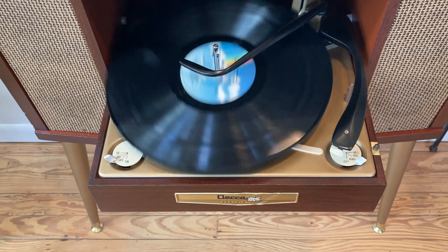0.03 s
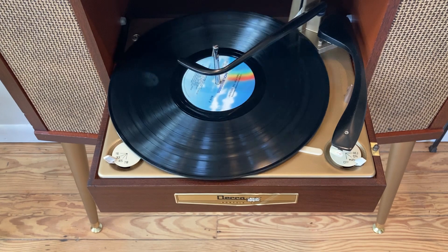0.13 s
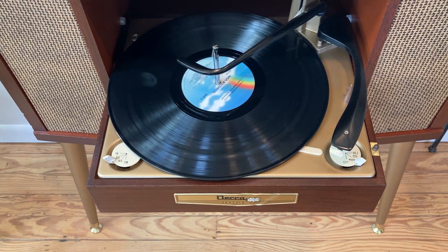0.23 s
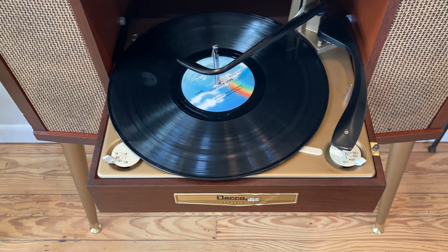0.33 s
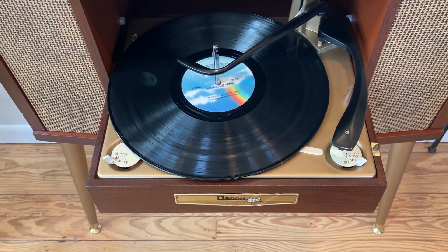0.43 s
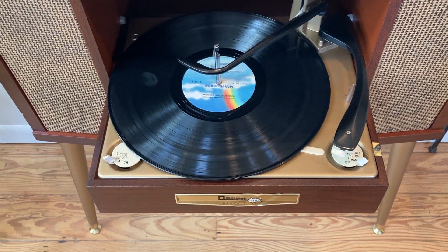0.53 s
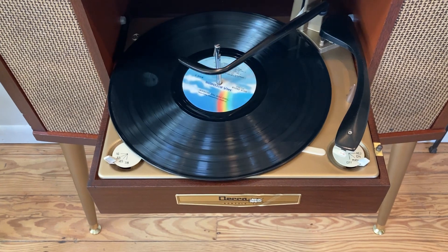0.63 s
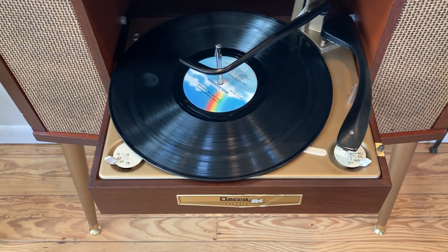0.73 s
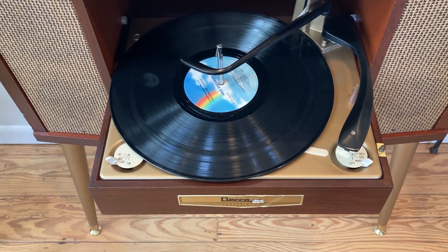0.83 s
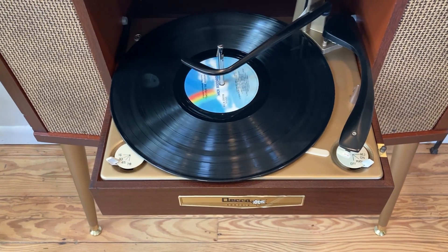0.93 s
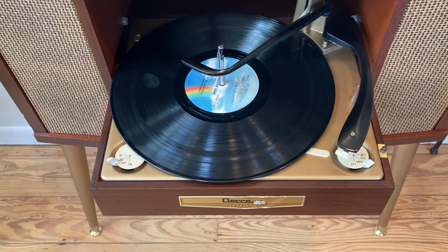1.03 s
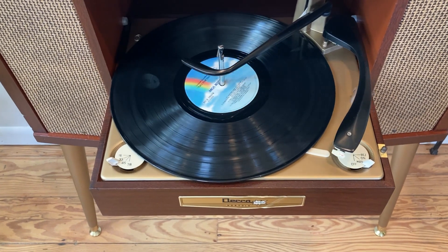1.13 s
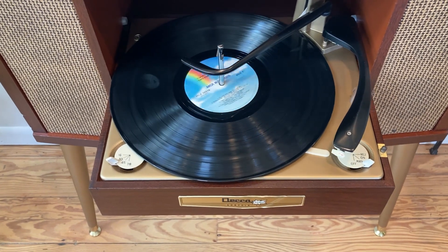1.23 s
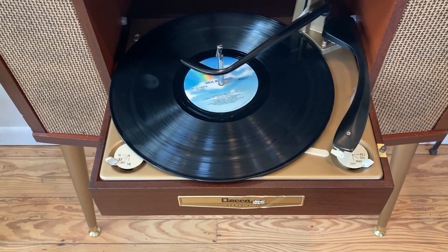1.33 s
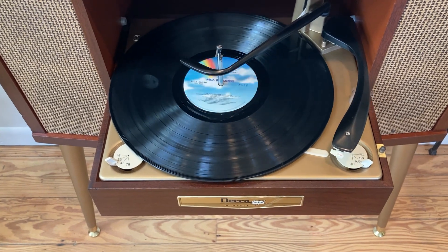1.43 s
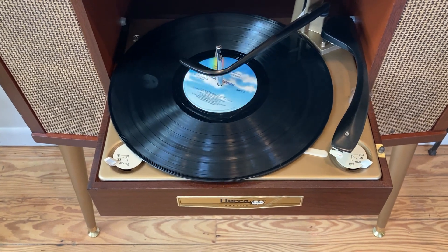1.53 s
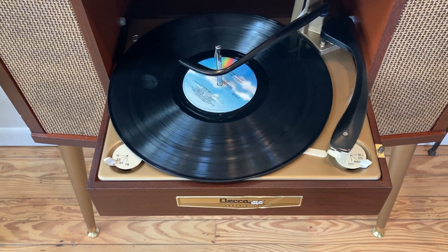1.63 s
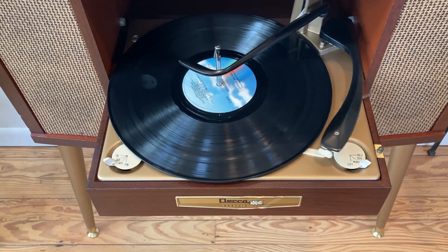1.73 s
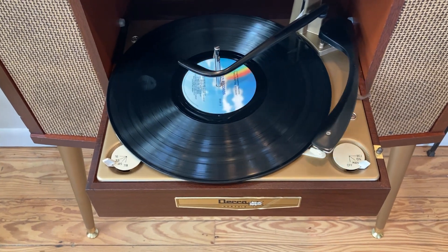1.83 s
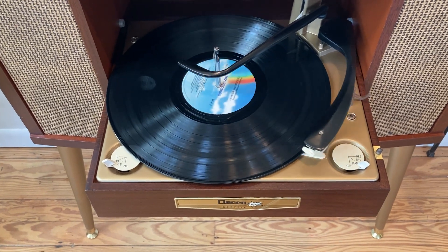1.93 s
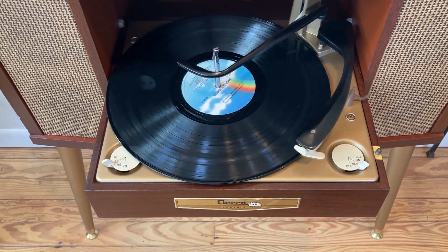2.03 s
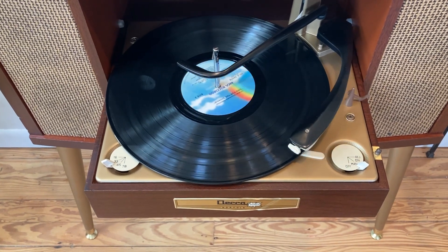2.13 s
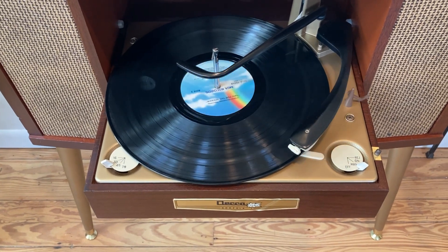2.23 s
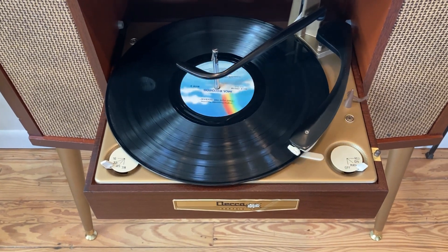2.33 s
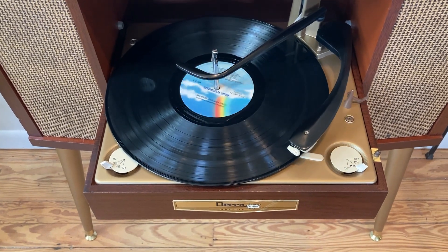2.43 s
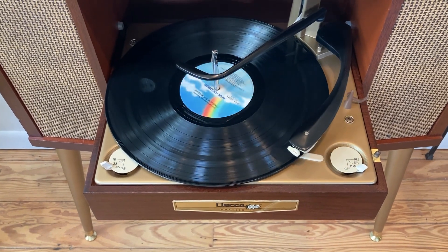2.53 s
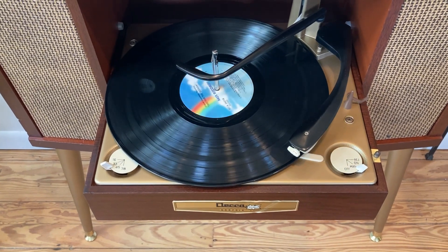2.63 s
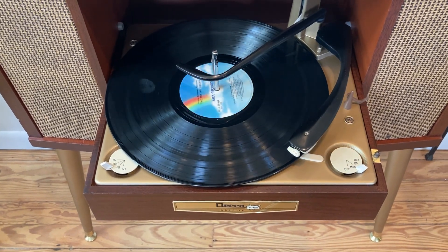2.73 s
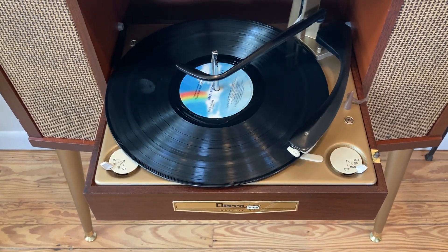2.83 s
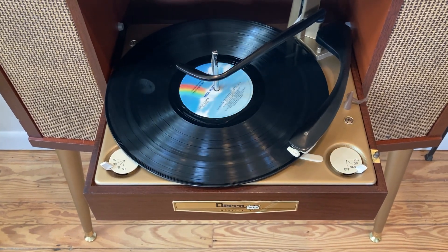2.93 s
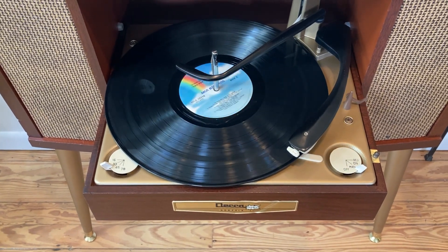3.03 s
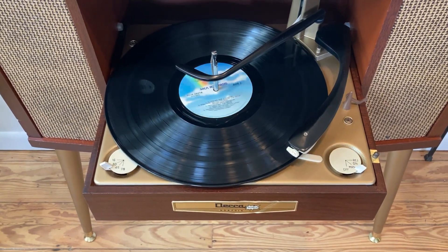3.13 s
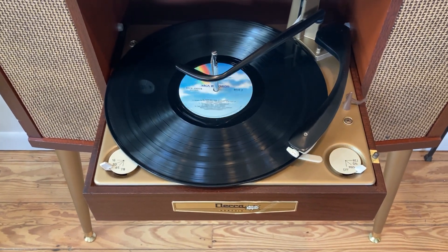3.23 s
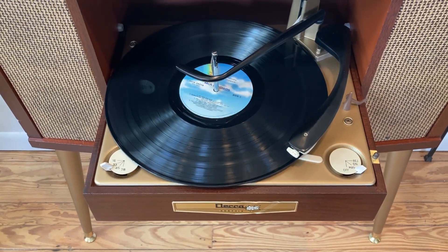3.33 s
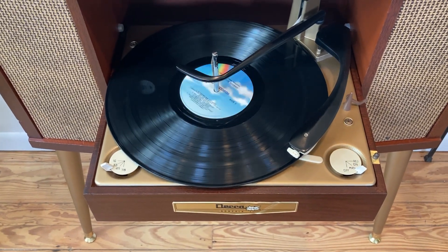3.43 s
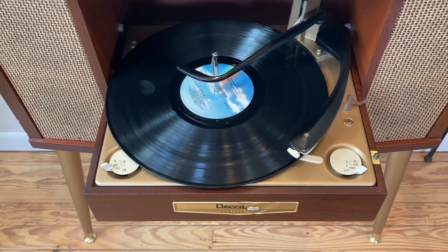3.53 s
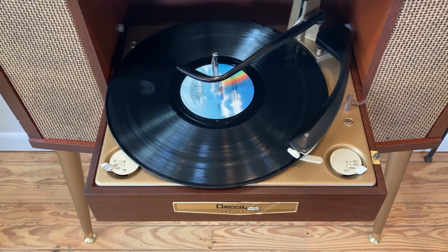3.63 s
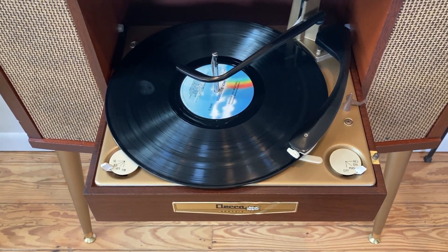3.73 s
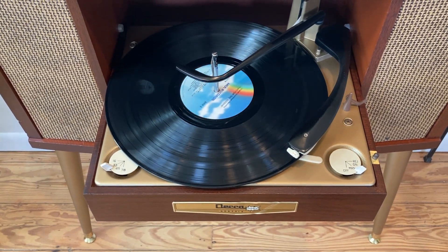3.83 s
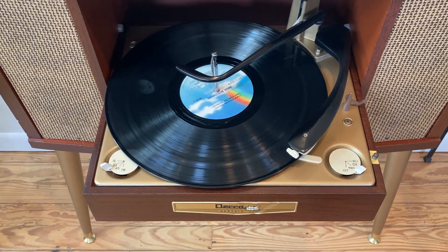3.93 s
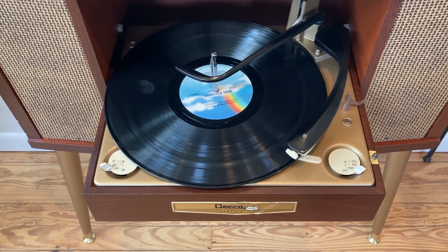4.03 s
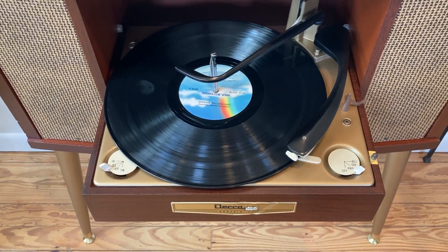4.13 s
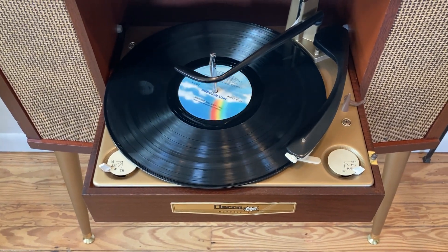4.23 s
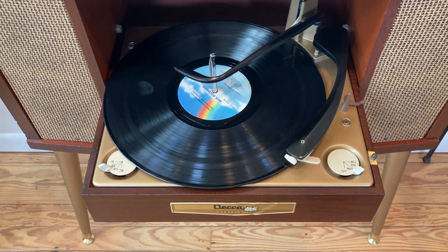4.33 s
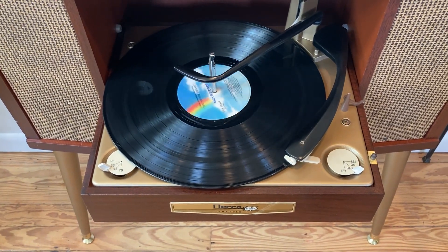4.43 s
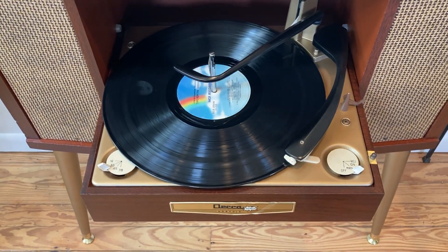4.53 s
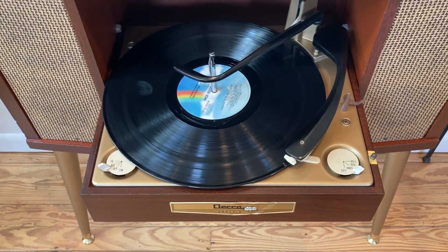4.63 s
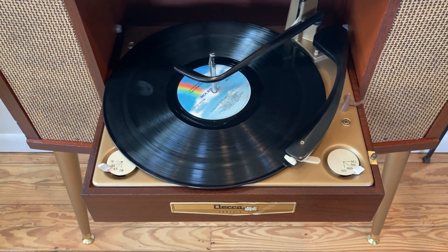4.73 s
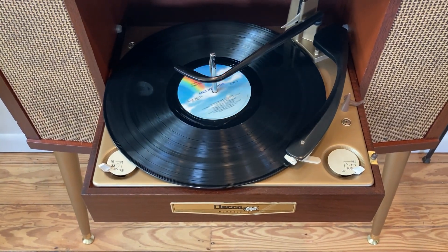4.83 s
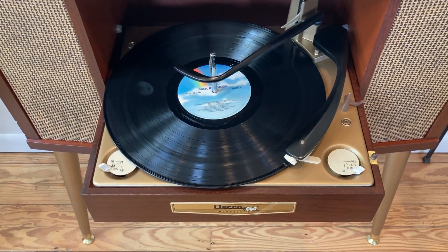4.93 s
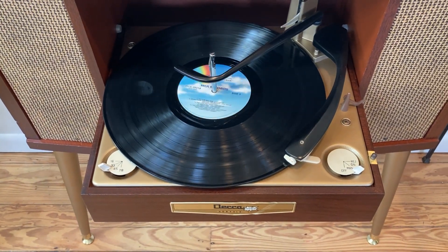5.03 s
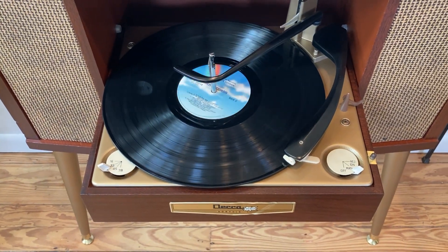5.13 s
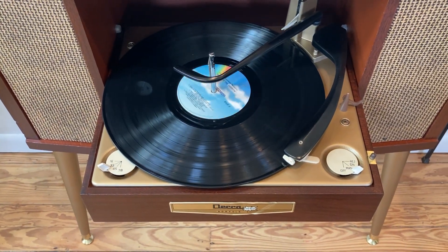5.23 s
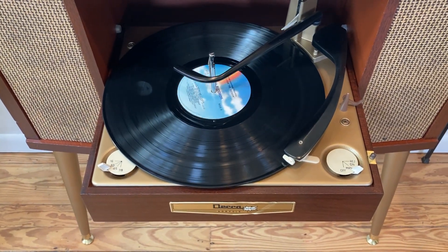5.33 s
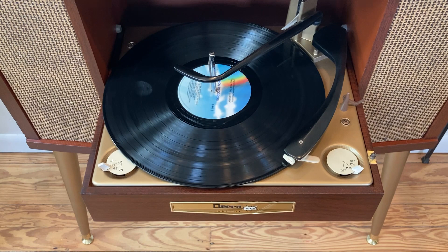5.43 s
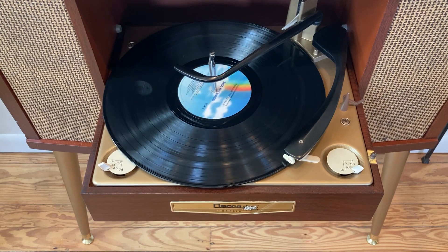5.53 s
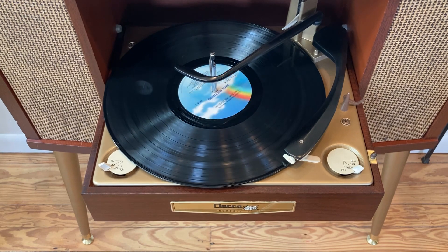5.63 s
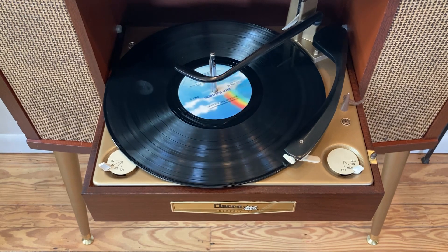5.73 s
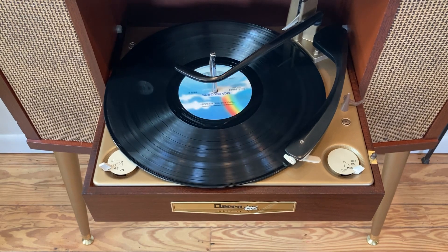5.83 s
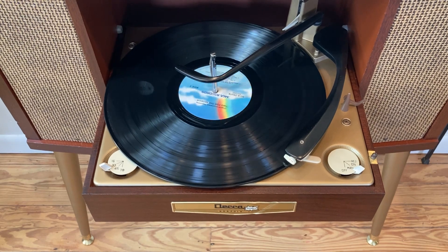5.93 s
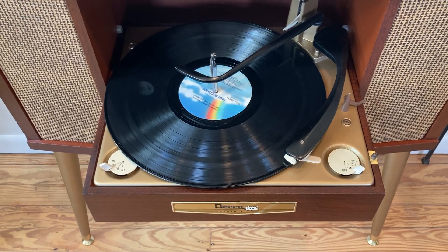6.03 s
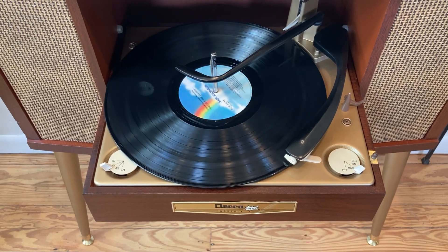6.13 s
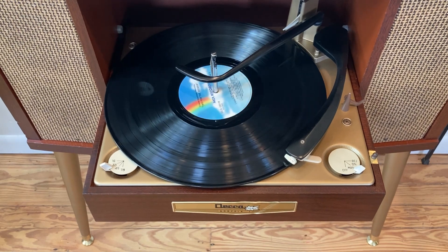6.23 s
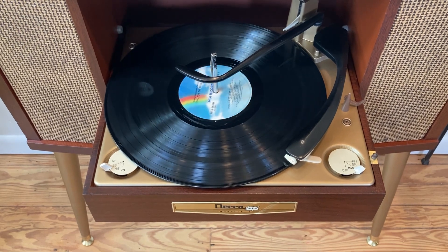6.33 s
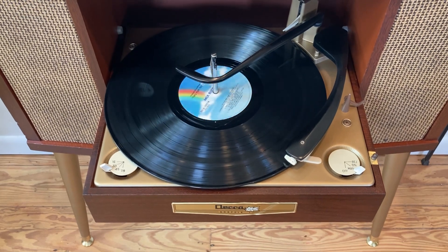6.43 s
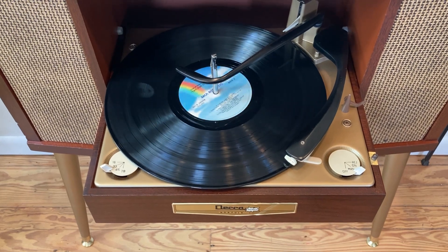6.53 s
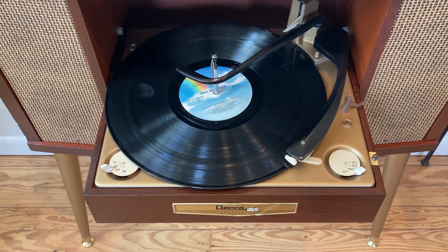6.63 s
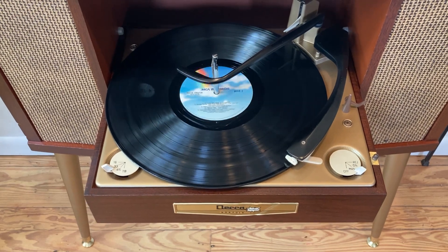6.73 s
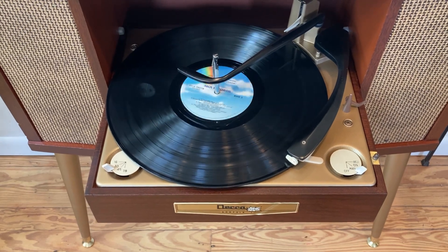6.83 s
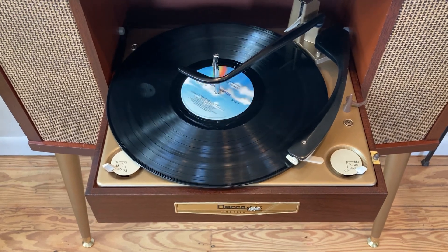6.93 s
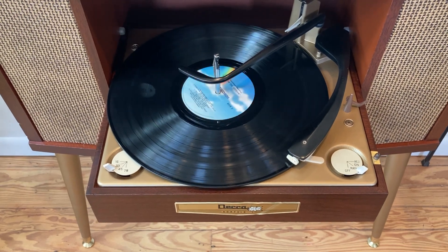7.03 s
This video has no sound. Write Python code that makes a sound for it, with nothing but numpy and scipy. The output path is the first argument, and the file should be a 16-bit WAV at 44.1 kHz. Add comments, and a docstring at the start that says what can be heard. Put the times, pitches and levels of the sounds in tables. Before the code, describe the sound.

Right at the start a record rattles down the spindle and lands with a loud, quick clatter, the metal deck ringing and the wooden cabinet thudding, with a low ring dying away by about 1 second. A quiet, steady motor hum and rumble run underneath throughout. A lever clicks sharply at 1.1 seconds and more softly at 1.4. Faint squeaks and tiny ticks follow between 1.7 and 3.3 seconds, then another clear click at 3.4. Light ticks and knocks gather from 4.2 seconds and lead to three heavier clunks at about 4.9, 5.1 and 5.2. From there the needle rubs faintly in the groove with a few soft swishes, and one dull pop sounds at 6.3 seconds. The hum carries on to the end, just after 7 seconds. Everything sounds close, with the short reverberation of a small room.

```python
"""Record changer cycle

A record rattles down the spindle and the metal deck bounces in its wooden cabinet. Cams click the levers
among faint squeaks, and the cycle ends in clunks as the needle starts to rub in the groove; later it pops
once. Motor hum and rumble lie underneath, in a small room, with the treble widened in stereo."""
import sys
import numpy as np
from scipy import signal
from scipy.fft import rfft, irfft
from scipy.io import wavfile

SR = 44100
rng = np.random.default_rng(int(sys.argv[2]) if len(sys.argv) > 2 else 0)


def to_wav(sig):
    """Store sig (one row per channel, or 1-D mono) as 16-bit WAV at the path in sys.argv[1].

    Samples outside -1..1 are clipped; the rate is SR.
    """
    pcm = np.clip(np.atleast_2d(sig), -1, 1) * 32767
    pcm = np.round(pcm).astype(np.int16)
    wavfile.write(sys.argv[1], SR, pcm.T)  # frames by channels


N = 313110


def from_db(db):
    return 10 ** (np.asarray(db) / 20)


def unit_rms(x):
    return x / np.sqrt(np.mean(x ** 2) + 1e-20)


def at_hz(curve, hz):
    return np.interp(np.log(hz), np.log(np.array(curve)[:, 0]), np.array(curve)[:, 1])


def butter(x, hz, kind, order=2):
    return signal.sosfilt(signal.butter(order, hz, kind, fs=SR, output="sos"), x)


def pan(left_over_right_db):
    return from_db(left_over_right_db * np.array([[.5], [-.5]]))


def drift(rate_hz):
    """A smooth random wander with a spread of 1."""
    r = np.exp(-80 * np.pi * rate_hz / SR)
    slow = signal.lfilter([1], [1, -2 * r, r * r], rng.standard_normal(N // 40 + 2002))[2000:]
    return np.interp(np.arange(N) / 40, np.arange(len(slow)), unit_rms(slow))


def resonance(x, hz, width_hz):
    """A two-pole peak with unity gain at its centre."""
    r = np.exp(-np.pi * width_hz / SR)
    poles = [1, -2 * r * np.cos(2 * np.pi * hz / SR), r * r]
    return signal.lfilter([(1 - r * r) / 2, 0, (r * r - 1) / 2], poles, x)


def ring(force, modes):
    """A force rings a body's modes; the longer the decay, the narrower the peak."""
    return sum(from_db(db) * t60 * resonance(force + 1e-18, hz, np.log(1000) / np.pi / t60) * (-1) ** k
               for k, (hz, db, t60) in enumerate(modes))


def swells(cues):
    """Bell-shaped swells of level, one for each cue."""
    t = np.arange(N) / SR
    return sum(from_db(db) * np.exp(-.5 * (1000 * (t - s) / spread_ms) ** 2) for s, db, spread_ms in cues)


def ringing_noise(peaks):
    """Grainy stereo noise rings small parts."""
    grains = rng.standard_normal((2, N))
    return unit_rms(sum(from_db(db) * resonance(resonance(grains, hz, 3 * width), hz, width)
                        for hz, width, db in peaks))


# Tone of the room and microphone noise: (frequency [Hz], relative density [dB])
RUMBLE_SPECTRUM = [(20, -46.5), (35, -15.5), (65, -3.5), (225, -4), (294, -16), (533, -17), (890, -35.5),
                   (1750, -39), (4500, -45.5), (7300, -47.5), (9500, -49), (12300, -37.5), (15000, -45)]
# How alike its two sides sound: (frequency [Hz], correlation [0-1])
RUMBLE_LIKENESS = [(60, 0.92), (180, 0.77), (550, 0.55), (1650, 0.09), (4970, 0.05), (15000, 0.1)]
# Balance of rumble, hum and drone: (frequency [Hz], left over right [dB])
BED_PAN = [(60, -4.5), (240, -2.5), (950, 3.5), (3770, 1.5), (15000, 0.5)]
def room_rumble(level_db=-58, flicker_db=0.67):
    """Bass-heavy room tone in half-octave bands, each with its own flicker, width and pan."""
    out, edges = 0, 20 * 2 ** np.arange(0, 10, .5)
    white = rng.standard_normal((2, 2, N))
    for k, (low, high) in enumerate(zip(edges, edges[1:])):
        mid, side = butter(white[k % 2], [low, high], "band")
        hz = np.sqrt(low * high)
        alike = at_hz(RUMBLE_LIKENESS, hz)
        band = np.sqrt(1 + alike) * mid + np.sqrt(1 - alike) * side * [[1], [-1]]
        gain = from_db(at_hz(RUMBLE_SPECTRUM, hz) + flicker_db * drift(rate_hz=14))
        out = out + band * gain * pan(at_hz(BED_PAN, hz))
    return from_db(level_db) * unit_rms(out)


# The motor's hum tones: (frequency [Hz], level [dB])
HUM_TONES = [(120, -61.5), (180, -61), (300, -81.5), (360, -76), (420, -81), (540, -76), (600, -91.5),
             (660, -85), (1420, -93)]
def motor_hum(waver_db=1.5):
    """The mains hums in the motor: steady pitches that waver a little in level."""
    t, out = np.arange(N) / SR, np.zeros((2, N))
    for hz, db in HUM_TONES:
        tone = np.sqrt(2) * np.sin(2 * np.pi * (hz * t + rng.random()))
        out += tone * from_db(db + waver_db * drift(rate_hz=2.5)) * pan(at_hz(BED_PAN, hz))
    return out


# Resonances of the shaken case: (frequency [Hz], width [Hz], level [dB])
DRONE_BANDS = [(70, 13, -58.5), (224.3, 14, -58.5), (269, 5, -74.5), (4700, 450, -87.5), (7450, 250, -94)]
def case_drone():
    """The running gear shakes the case at random."""
    out = np.zeros((2, N))
    for hz, width, db in DRONE_BANDS:
        shake = unit_rms(resonance(resonance(rng.standard_normal(N), hz, width), hz, 2 * width))
        out += shake * from_db(db) * pan(at_hz(BED_PAN, hz))
    return out


# Voice of the chatter and short rings: (frequency [Hz], width [Hz], relative level [dB])
RING_PEAKS = [(1290, 170, 0), (1140, 42, -14), (1900, 500, -13)]
# Bounce and squeak cues: (time [s], level [dB])
RING_CUES = [(0.015, -55), (.41, -63), (0.511, -66), (.58, -75.5), (0.769, -78.5), (1.72, -57), (2.25, -68),
             (2.31, -76), (2.77, -76), (3.305, -72)]
def bounces_and_squeaks(chatter_db=-85.5, wander_db=5, spread_ms=9):
    """Short rings near 1.3 kHz over a chatter: the deck bouncing after the drop, later faint squeaks."""
    chatter = from_db(chatter_db + wander_db * drift(rate_hz=30))
    rings = swells([(s, db, spread_ms) for s, db in RING_CUES])
    return (chatter + rings) * ringing_noise(RING_PEAKS)


# The needle's voice: (frequency [Hz], width [Hz], relative level [dB])
NEEDLE_PEAKS = [(2090, 130, 1.5), (2650, 126, -1), (3290, 50, -1.5), (3910, 130, 0.5), (4100, 140, -3.5),
                (6590, 240, -4), (12490, 650, -5), (2850, 930, -6)]
# Rough patches of groove: (time [s], level [dB], spread [ms])
GROOVE_SWISHES = [(5.3, -64.5, 88), (5.77, -70.5, 15), (6.12, -76.5, 16.2), (6.52, -69.5, 14),
                  (6.58, -69.5, 28), (6.68, -76, 12)]
def needle_rub(start_s=4.9, rise_s=.4, level_db=-75, fade_db_per_s=2, wander_db=3):
    """The needle rubs its groove: it fades in, slowly eases and swishes over rough patches."""
    since = np.maximum(np.arange(N) / SR - start_s, 0)
    rub = np.minimum(since / rise_s, 1) * from_db(level_db - fade_db_per_s * since)
    wander = from_db(wander_db * drift(rate_hz=18))
    return (rub + swells(GROOVE_SWISHES)) * wander * ringing_noise(NEEDLE_PEAKS)


# Dust under the needle: (time [s], level [dB], dull above [Hz])
DUST_SPECKS = [(6.296, -37.5, 900)]
def dust_pop():
    """A speck sends one dull pulse through the loudspeaker cones."""
    out = np.zeros(N)
    for s, db, dull_hz in DUST_SPECKS:
        swell = 2 * np.pi * dull_hz * np.maximum(np.arange(N) / SR - s, 0)
        out += from_db(db) * swell * np.exp(1 - swell)
    return butter(out, 60, "high")


# Low thuds under the drop and the pop: (time [s], pitch [Hz], level [dB], t60 [s])
THUD_CUES = [(0.078, 145, -26.5, .12), (0.132, 125, -28, .12), (0.225, 63.4, -25.5, 0.21),
             (.36, 227.3, -39.5, 0.94), (6.297, 196, -23.5, 0.022), (6.3, 66, -35.5, 0.1)]
def deck_thuds():
    """The sprung deck settles and sets the case humming in low rings that swell and die."""
    out = np.zeros(N)
    for s, hz, db, t60 in THUD_CUES:
        t = np.maximum(np.arange(N) / SR - s, 0)
        attack = 1 - np.exp(-t * hz)
        out += from_db(db - 60 * t / t60) * attack * np.sin(2 * np.pi * hz * t)
    return out


def blow_forces(cues, knock_hz, thump_hz, rise_ms, decay_ms, swell_ms, roughness=3.2):
    """Knock, clank, tick and thump drives: each blow is a short rattle of contacts and a slower push."""
    forces, t_ms = np.zeros((4, N)), np.arange(4000) / SR * 1000
    for s, *levels_db in cues:
        contacts = 1.44 * np.tanh(2.5 * rng.standard_normal((2, len(t_ms))))   # no contact sticks out
        rattle = contacts[0] * (1 - np.exp(-t_ms / rise_ms)) ** 1.8 * np.exp(-t_ms / decay_ms)
        # where a blow lands picks the pitches that speak
        knock = resonance(resonance(rattle, knock_hz, 1500), knock_hz, 1500)
        swell = t_ms / swell_ms
        grit = roughness * butter(contacts[1], 2500, "low")
        push = (np.sin(2 * np.pi * thump_hz * t_ms / 1000) + grit) * swell * np.exp(1 - swell)
        at = round(s * SR)
        forces[:, at:at + len(t_ms)] += from_db(levels_db)[:, None] * [knock, rattle, rattle, push]
    return forces


# Ring of the metal deck: (frequency [Hz], level [dB], t60 [s])
DECK_MODES = [(624.3, -10.5, 0.41), (755, 9, 0.064), (1314, -5.5, 0.17), (2420, -7, 0.0017),
              (2774, 0, 0.045), (3850, -6.5, 0.018)]
# Ring of the wooden case: (frequency [Hz], level [dB], t60 [s])
CASE_MODES = [(143, -9.5, .08), (226.9, -5.5, .18), (250.4, -4, 0.065), (285, -3, 0.075), (359, 0.5, .07),
              (433, -0.5, .07), (509, -1.5, .06), (709, -3.5, 0.11)]
# The record rattles down and lands: (time [s], knock [dB], clank [dB], tick [dB], thump [dB])
RECORD_DROP = [(0.037, -13.5, -44, -37.5, -32), (0.048, -13.5, -32.5, -23, -23),
               (0.071, -30, -27.5, -19.5, -51), (0.082, -20.5, -24, -27.5, -22.5),
               (0.106, -17.5, -22.5, -20.5, -29.5), (0.134, -11, -10.5, -15, -17.5),
               (0.151, -14.5, -38, -21.5, -22.5), (0.177, -23.5, -12.5, -21, -30)]
# Cams trip the levers: (time [s], knock [dB], clank [dB], tick [dB], thump [dB])
LEVER_CLICKS = [(1.068, -25.5, -28, -32.5, -43), (1.395, -36.5, -88, -52, -50),
                (1.699, -59.5, -88, -79, -53.5), (1.718, -53, -79, -80, -62), (2.192, -52.5, -57, -70, -56),
                (2.851, -59.5, -78, -85, -59), (3.391, -34, -67, -58, -41.5), (3.401, -28, -36, -33, -45.5),
                (4.17, -53, -57, -61, -65), (4.518, -65, -69, -61.5, -68), (4.628, -63, -46, -40.5, -66),
                (4.713, -52, -46, -59, -70), (4.819, -49.5, -48.5, -51, -50.5),
                (5.842, -55.5, -60, -72, -85)]
# Heavy parts knock as the gear unmeshes: (time [s], knock [dB], clank [dB], tick [dB], thump [dB])
GEAR_CLUNKS = [(4.207, -43.5, -68, -67, -56.5), (4.482, -36, -52, -61, -43), (4.872, -41, -38.5, -49, -47),
               (4.886, -28, -33, -21.5, -27), (5.088, -32.5, -40.5, -32, -36),
               (5.108, -21.5, -25, -20, -29), (5.229, -19.5, -34, -21, -26.5),
               (5.347, -51.5, -48, -58, -63)]
def changer_blows():
    """Record, levers and gear strike the metal deck, tick brightly and thump the wooden case."""
    knock, clank, tick, thump = (
        blow_forces(RECORD_DROP, knock_hz=780, thump_hz=210, rise_ms=4.5, decay_ms=6.6, swell_ms=3.5)
        + blow_forces(LEVER_CLICKS, knock_hz=1105, thump_hz=225, rise_ms=2.05, decay_ms=4.64, swell_ms=5.5)
        + blow_forces(GEAR_CLUNKS, knock_hz=740, thump_hz=269, rise_ms=4.17, decay_ms=5.14, swell_ms=5))
    strike = from_db(13.5) * knock + from_db(12) * butter(clank, [1700, 3300], "band")
    deck = strike + from_db(25.5) * ring(strike, DECK_MODES)
    ticks = from_db(7) * butter(tick, 4400, "high", order=4) + from_db(9.5) * resonance(tick, 11500, 3500)
    case = from_db(32) * ring(butter(thump, 670, "low"), CASE_MODES)
    return deck * pan(3) + ticks + case   # the deck sits slightly left


# The small room's reverb bands: (centre [Hz], relative level [dB], t60 [s])
REVERB_BANDS = [(180, -1, 0.37), (497, 3, 0.32), (1160, 0.5, 0.12), (2090, 3, .3), (5000, 1, 0.13),
                (11074, -3, 0.24)]
def room_reverb(source, side_db=-1.5, onset_s=0.0013):
    """Dense reflections die band by band: mono in the bass, wide above."""
    t = np.arange(SR // 2) / SR
    reflections = 0
    for hz, db, t60 in REVERB_BANDS:
        band = butter(rng.standard_normal((2, len(t))), [hz / 1.954, min(hz * 1.8, .45 * SR)], "band")
        reflections = reflections + band * from_db(db - 60 * t / t60)
    mid, side = reflections * np.minimum(t / onset_s, 1)
    side = from_db(side_db) * butter(side, 700, "high", order=1)
    tail = np.array([mid + side, mid - side])
    tail = tail / np.sqrt(np.sum(tail ** 2) / 2)
    return signal.fftconvolve(source.mean(axis=0)[None], tail, axes=1)[:, :N]


def scene():
    """The blows and their reverb sit up front, over the bed and the small details."""
    blows = changer_blows()
    reverb = from_db(-6.5) * room_reverb(blows)
    bed = room_rumble() + motor_hum() + case_drone()
    return bed + bounces_and_squeaks() + needle_rub() + dust_pop() + deck_thuds() + blows + reverb


def record(dry, crossover_hz=5830, lead_ms=.059, lag_ms=.22, top_hz=13100, cutoff_hz=16400):
    """Stereo widening: left lows slightly early, left treble a late, inverted copy of the right."""
    hz = np.fft.rfftfreq(N, 1 / SR)
    left, right = rfft(dry)
    treble_share = 1 / (1 + (crossover_hz / (hz + 1)) ** 12)
    early, late = np.exp(2j * np.pi * hz * np.array([[lead_ms], [-lag_ms]]) / 1000)
    left = np.sqrt(1 - treble_share) * early * left - np.sqrt(treble_share) * late * right
    stereo = irfft(np.array([left, right]), N)
    top_drop = signal.ellip(7, .5, 29, top_hz, fs=SR, output="sos")   # the air drops by 29 dB or more
    top_cut = signal.cheby2(12, 70, cutoff_hz, fs=SR, output="sos")
    return signal.sosfilt(top_cut, signal.sosfilt(top_drop, stereo))


dry = scene()
out = record(dry)
to_wav(out)
```